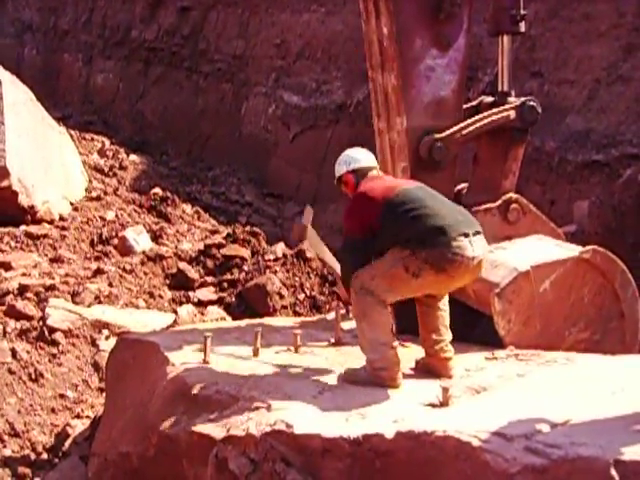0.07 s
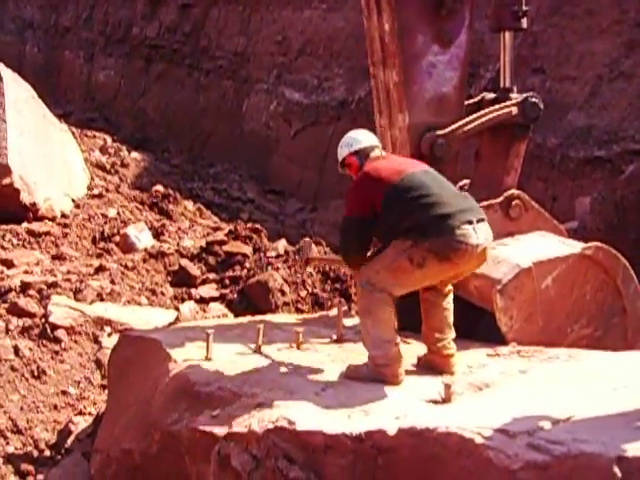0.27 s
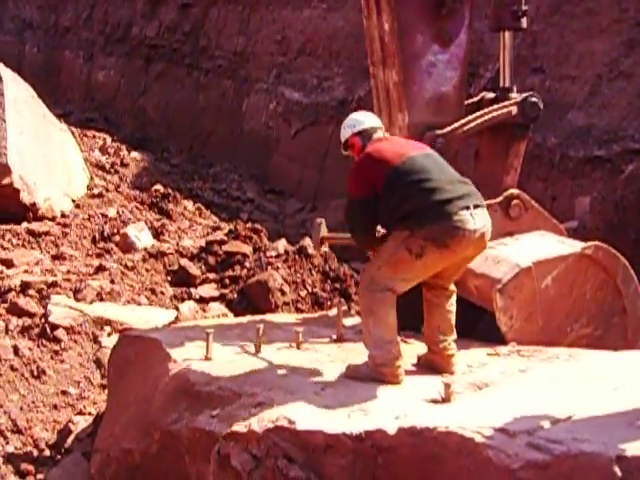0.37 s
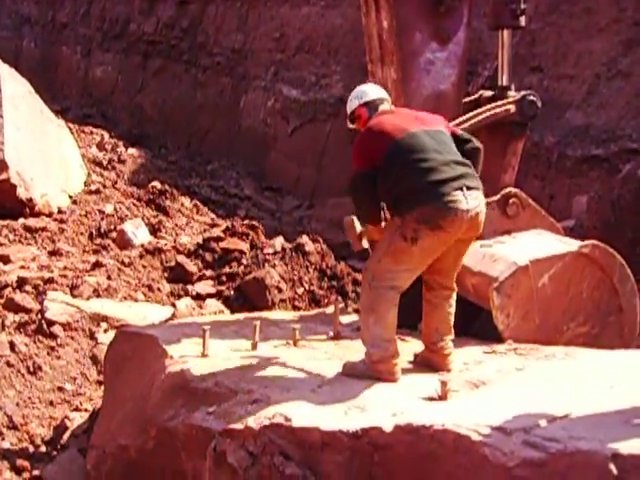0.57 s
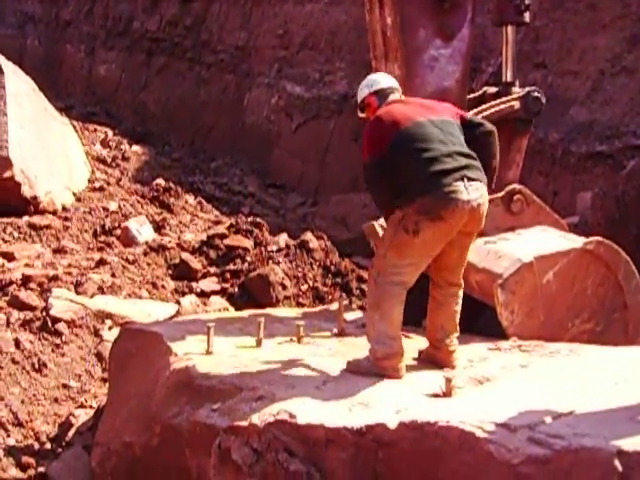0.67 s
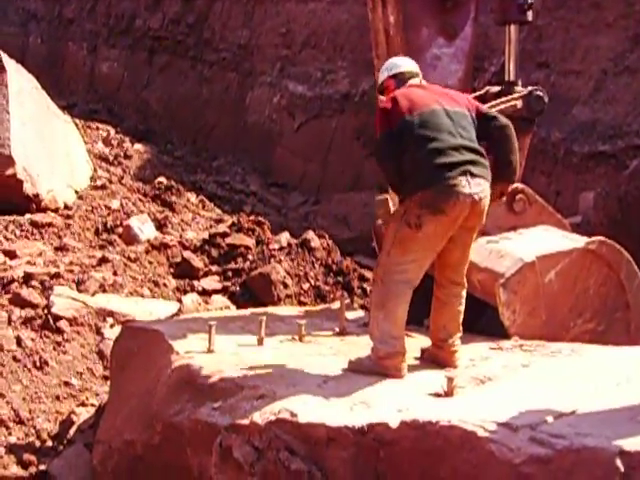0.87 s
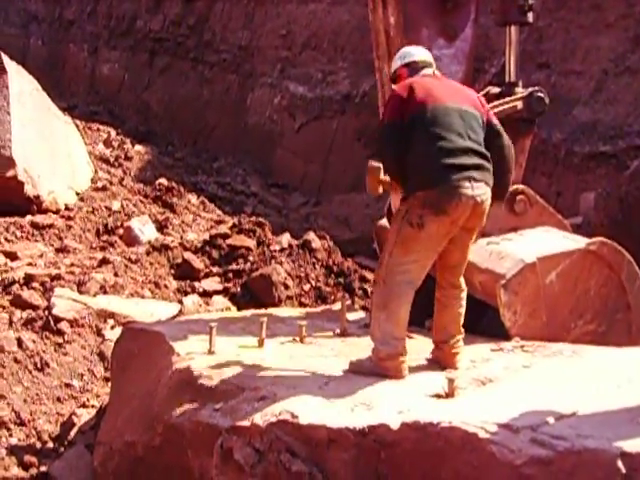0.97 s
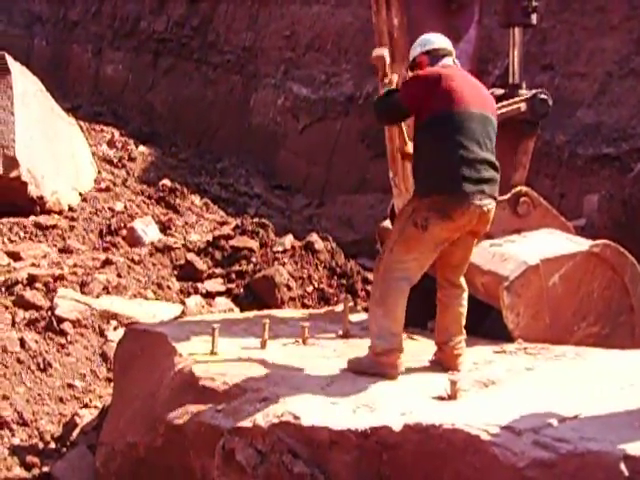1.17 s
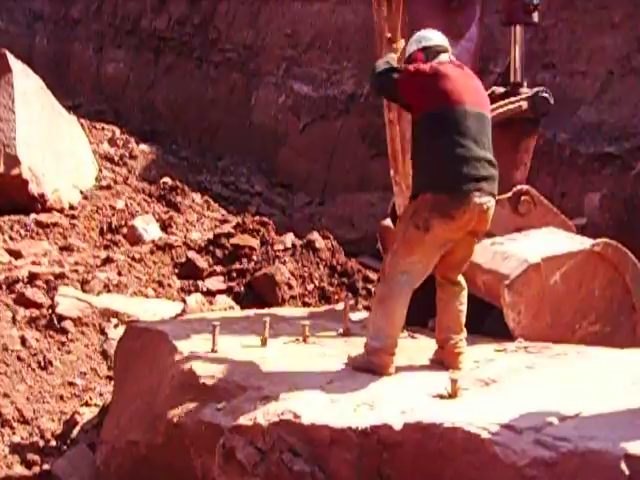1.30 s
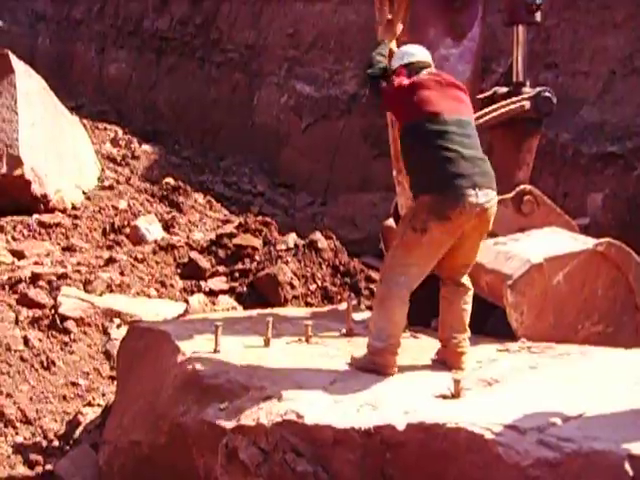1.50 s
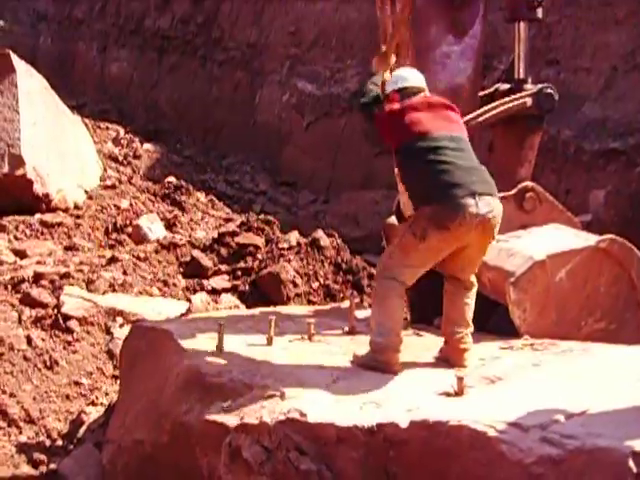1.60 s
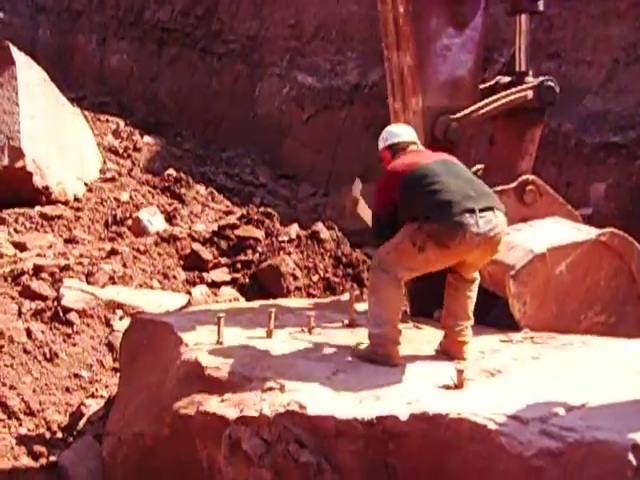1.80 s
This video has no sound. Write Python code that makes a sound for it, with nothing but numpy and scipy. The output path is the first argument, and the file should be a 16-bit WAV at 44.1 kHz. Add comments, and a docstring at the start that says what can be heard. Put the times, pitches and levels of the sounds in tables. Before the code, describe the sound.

One loud hammer blow on a steel wedge cracks and thuds, slightly distorted, then leaves a fading high metallic ring and a short echo off quarry walls. Faint machinery hiss and wind buffeting the microphone continue throughout.

```python
"""In an open quarry, a sledgehammer strikes a steel wedge in a stone slab once.
The impact excites the natural modes of both bodies: the slab thuds, and the steel cracks and rings
on one high note. Rubble and rock faces scatter the blow, which overloads the microphone.
Throughout, machinery hisses steadily and wind buffets the microphone."""
import sys
import numpy as np
from scipy import signal
from scipy.fft import rfft, irfft
from scipy.io import wavfile

SR = 44100
rng = np.random.default_rng(int(sys.argv[2]) if len(sys.argv) > 2 else 0)


def wav_record(signal):
    """Record a signal, one row per channel, as 16-bit PCM in the file named by sys.argv[1]."""
    frames = np.transpose(np.atleast_2d(signal))
    bounded = np.clip(frames, -1, 1)
    # unit amplitude maps onto the largest positive 16-bit level
    quanta = np.round(bounded * 32767).astype(np.int16)
    wavfile.write(sys.argv[1], SR, quanta)


N = 81585
TIME = np.arange(N) / SR
BLOW_S = 0.2103


def from_db(db):
    """Decibel law: 20 dB is a factor of ten in amplitude."""
    return 10 ** (np.asarray(db) / 20)


def unit_rms(x):
    """Normalisation to a mean power of one."""
    return x / np.sqrt(np.mean(x ** 2) + 1e-20)


def filtered_noise(gain):
    """Spectral shaping: white noise weighted by gain(frequency), at unit rms."""
    hz = np.maximum(np.fft.rfftfreq(2 * N, 1 / SR), 1)
    white_spectrum = rfft(rng.standard_normal(2 * N))
    return unit_rms(irfft(white_spectrum * gain(hz))[:N])


def coloured_noise(spectrum):
    """Spectral envelope: noise whose level is interpolated over log frequency."""
    points_hz, db = np.transpose(spectrum)
    return filtered_noise(lambda hz: from_db(np.interp(np.log(hz), np.log(points_hz), db)))


def resonant_noise(centre, half_width):
    """Resonance: noise confined to one narrow peak."""
    return filtered_noise(lambda hz: 1 / (1 + ((hz - centre) / half_width) ** 2))


def low_pass(x, hz, order):
    """Maximally flat filtering: components above the cutoff are attenuated."""
    return signal.sosfilt(signal.butter(order, hz, fs=SR, output="sos"), x)


def burst(start, rise, t60, hold=0):
    """Exponential damping: an envelope that rises and, after the hold, loses 60 dB per t60."""
    age = np.maximum(TIME - start, 0)
    return (1 - np.exp(-age / rise)) * from_db(-60 * np.maximum(age - hold, 0) / t60)


def free_vibration(modes, start, rise):
    """Modal superposition: damped sinusoids set off together."""
    return sum(from_db(db) * burst(start, rise, t60) * np.sin(2 * np.pi * hz * (TIME - start))
               for hz, db, t60 in modes)


# Spectrum of the machinery hiss: (frequency [Hz], relative spectral level [dB])
HISS_SPECTRUM = [(120, -16), (230, -6), (310, -9.5), (450, -6.5), (650, -6), (1000, -6.5), (1500, -6),
                 (2000, -4), (2500, -0.5), (2900, -4), (3600, -0.5), (4200, -0.5), (4650, -2.5), (5900, -1),
                 (7100, -3.5), (8200, -4), (9400, 0.5), (10500, -2.5), (11400, -7), (14000, -17)]
# Faint whistles in the hiss: (frequency [Hz], half-width [Hz], level [dB])
WHISTLE_BANDS = [(4090, 380, -58.5), (6180, 94, -60.5), (7120, 130, -56), (10040, 130, -62)]
def machinery():
    """Broadband and narrowband noise: a steady hiss, faint whistles and a low hum that joins late."""
    hiss = from_db(-43.5) * unit_rms(low_pass(coloured_noise(HISS_SPECTRUM), hz=11380, order=20))
    whistles = sum(from_db(db) * resonant_noise(hz, half_width) for hz, half_width, db in WHISTLE_BANDS)
    hum_fade_in = np.clip((TIME - 1.15) / 0.256, 0, 1)
    hum = from_db(-59.5) * resonant_noise(centre=232.7, half_width=5.8) * hum_fade_in
    return hiss + whistles + hum


# Strength of the breeze: (time [s], level [dB])
BREEZE_LEVELS = [(0, -31), (.2, -34), (.45, -42.5), (.62, -41.5), (.9, -38), (1.1, -45), (1.3, -46),
                 (1.5, -41), (1.62, -45.5), (1.85, -39)]
# Spectrum of the breeze: (frequency [Hz], relative spectral level [dB])
BREEZE_SPECTRUM = [(15, 0), (32, 7), (60, -2.5), (110, -13.5), (170, -25.5), (300, -36.5), (700, -66.5)]
# Bell-shaped buffets: (time [s], half-duration [s], peak level [dB])
GUST_PULSES = [(.008, 0.0083, -31.5), (0.055, 0.029, -35), (0.139, 0.03, -31.5), (0.375, .03, -27.5),
               (0.514, 0.024, -31), (0.589, 0.013, -32), (0.7, 0.032, -28.5), (0.766, 0.019, -28),
               (0.822, 0.017, -26), (1.166, 0.013, -34), (1.239, 0.016, -33), (1.346, 0.02, -33.5),
               (1.451, 0.018, -28.5), (1.758, .012, -30), (1.798, 0.016, -38)]
# Spectrum of the buffets: (frequency [Hz], relative spectral level [dB])
GUST_SPECTRUM = [(15, -6.5), (35, 6), (65, -1.5), (110, -9), (170, -23.5), (300, -37), (700, -62)]
def wind():
    """Turbulence: fluctuating pressure on the microphone gives a low rumble and short buffets."""
    breeze = from_db(np.interp(TIME, *np.transpose(BREEZE_LEVELS)))
    gusts = sum(from_db(db) * np.exp(-((TIME - peak_s) / half_s) ** 2)
                for peak_s, half_s, db in GUST_PULSES)
    return breeze * coloured_noise(BREEZE_SPECTRUM) + gusts * coloured_noise(GUST_SPECTRUM)


# Modes of the slab: (frequency [Hz], level [dB], decay time T60 [s])
SLAB_MODES = [(43.2, -18.5, 0.43), (76.8, -11.5, 0.22), (109, -26, 0.55), (145, -38, 0.81),
              (204.5, -33.5, 1)]
def slab():
    """Impulse excitation: the wedge drives a dull thud and a low modal boom out of the stone."""
    start = BLOW_S - 0.00304  # the shock through stone arrives before the sound through air
    dull_noise = unit_rms(low_pass(rng.standard_normal(N), hz=1060, order=3))
    thud = from_db(-12.5) * dull_noise * burst(start, rise=0.0056, t60=0.099)
    boom = free_vibration(SLAB_MODES, start, rise=0.0052)
    return thud + boom


# Spectrum of the steel-on-steel contact: (frequency [Hz], relative spectral level [dB])
CRACK_SPECTRUM = [(150, -24.5), (500, -5), (1300, -4.5), (2200, -0.5), (2900, -4.5), (3800, 2),
                  (4900, -14.5), (5800, -10), (9000, -19), (15000, -36)]
# Modes of wedge and hammer: (frequency [Hz], level [dB], decay time T60 [s])
STEEL_MODES = [(964, -29, 0.14), (1367, -30.5, 0.11), (1545, -28, 0.13), (3230, -25, 0.24),
               (3390, -27, 0.33), (3434, -27, 0.34), (3506, -36.5, 0.3), (3650, -29, 0.18),
               (3630, -24, 0.31), (3870, -26, 0.3), (3800, -26, 0.41), (3942, -25, 0.22),
               (4237, -14, 0.089), (5771, -21, 0.16), (7500, -17.5, 0.15), (8265, -10, 0.4),
               (8269, -13, 0.93)]
def steel():
    """Impact and free vibration: brief contact gives a broadband crack, then the modes ring on."""
    contact = burst(BLOW_S, rise=0.00013, t60=0.042, hold=0.0019)
    crack = from_db(-2.5) * coloured_noise(CRACK_SPECTRUM) * contact
    ring = free_vibration(STEEL_MODES, BLOW_S, rise=0.0026)
    # Interference with its own echoes makes the ring waver.
    echo_response = rng.standard_normal(N) * burst(0, rise=0.0066, t60=0.5)
    echo_response /= np.linalg.norm(echo_response)
    echoes = from_db(-12) * signal.fftconvolve(ring, echo_response)[:N]
    return crack + ring + echoes


# Scatter from the nearby rubble: (frequency [Hz], relative spectral level [dB])
RUBBLE_SPECTRUM = [(100, -11), (260, -12.5), (450, -6.5), (750, -2.5), (1000, -2), (1350, 3.5),
                   (1700, -0.5), (2450, -1.5), (2850, -15.5), (3300, 3), (4000, 8), (4800, -10), (5700, -4),
                   (6600, -14.5), (9000, -7), (11500, -35), (15000, -54)]
# Reflections from the rock faces: (frequency [Hz], relative spectral level [dB])
ROCK_SPECTRUM = [(100, 10), (400, -9.5), (1200, -10), (2250, -5), (2800, -13), (3350, 3), (3900, -6.5),
                 (4600, -11), (6500, -27), (9500, -36), (13000, -48)]
def quarry_reflections():
    """Scattering and reflection: rubble returns the blow at once, the rock faces later and softer."""
    rubble = from_db(-7.5) * coloured_noise(RUBBLE_SPECTRUM) * burst(BLOW_S, rise=0.004, t60=0.17)
    faces = from_db(-23.5) * coloured_noise(ROCK_SPECTRUM) * burst(BLOW_S, rise=0.064, t60=0.71)
    echo_s = BLOW_S + 0.156  # one distinct return from the far face
    echo = from_db(-36) * coloured_noise(ROCK_SPECTRUM) * burst(echo_s, rise=0.0035, t60=0.29)
    return rubble + faces + echo


def scene():
    """Linear superposition: the pressures of all sources add in one channel."""
    return (machinery() + wind() + slab() + steel() + quarry_reflections())[None]


def record(dry):
    """Saturation and band limiting: the blow overloads the microphone; the top treble is weak, then cut."""
    ceiling, hardness = 0.77, 6.1
    shelf_hz, shelf_gain, cutoff_hz = 12300, from_db(-10.5), 15600
    clipped = dry / (1 + np.abs(dry / ceiling) ** hardness) ** (1 / hardness)
    shelf_kernel = signal.firwin(31, shelf_hz, fs=SR)
    below_shelf = signal.fftconvolve(clipped, shelf_kernel[None], "same")
    dulled = shelf_gain * clipped + (1 - shelf_gain) * below_shelf
    return signal.sosfilt(signal.ellip(10, .1, 80, cutoff_hz, fs=SR, output="sos"), dulled)


dry = scene()
out = record(dry)
wav_record(out)
```